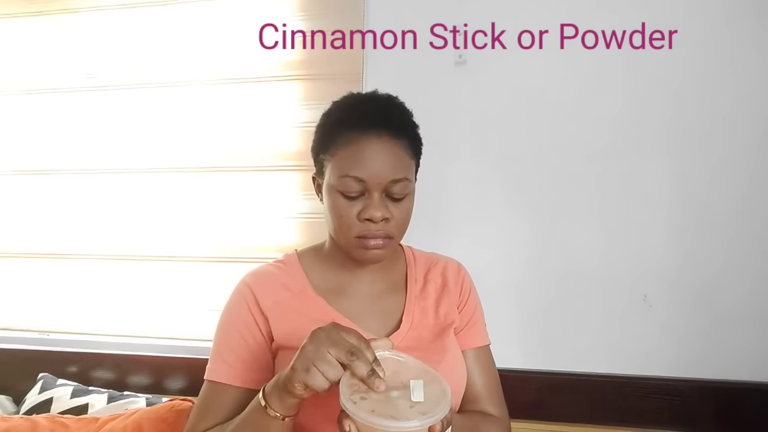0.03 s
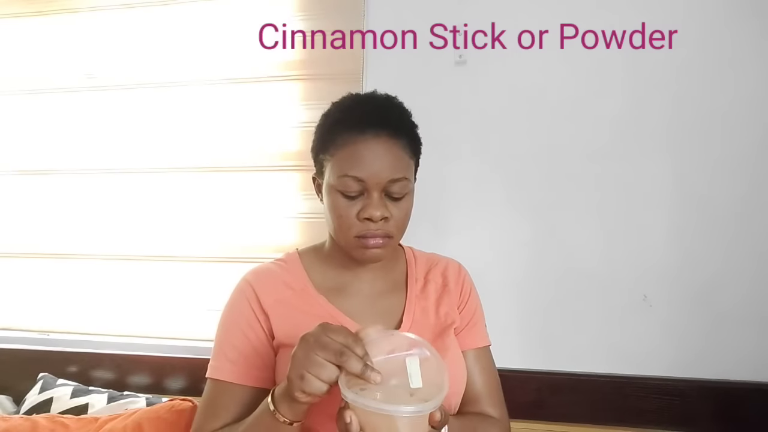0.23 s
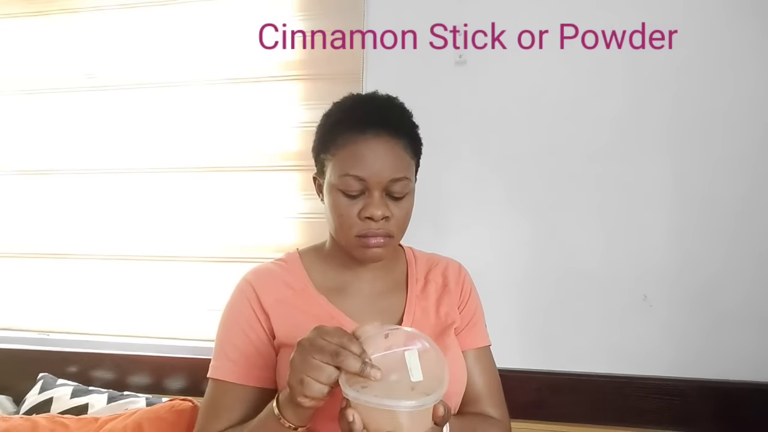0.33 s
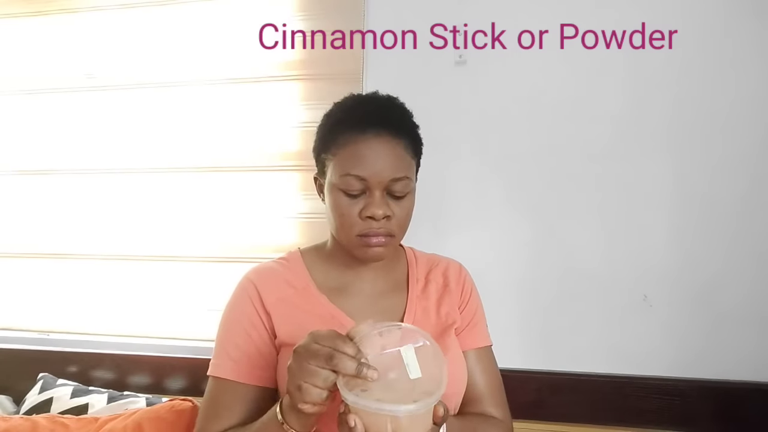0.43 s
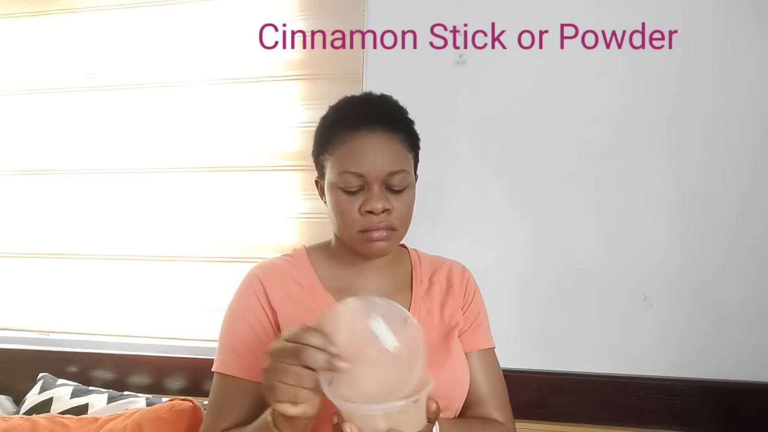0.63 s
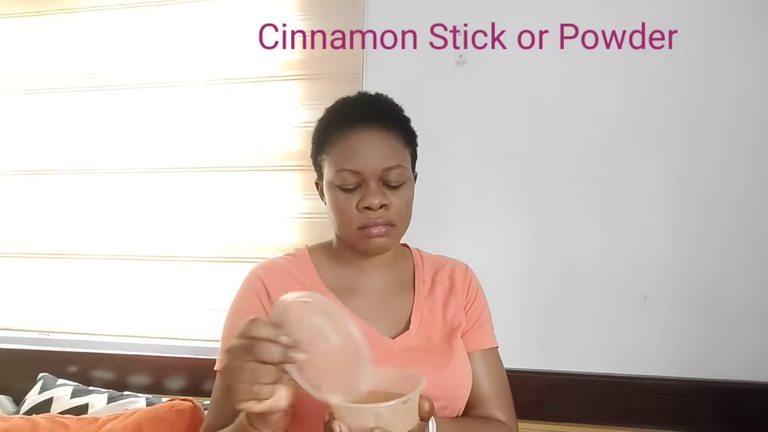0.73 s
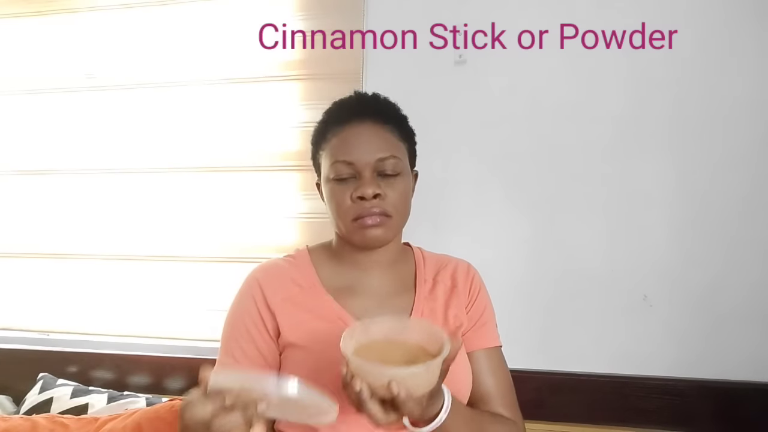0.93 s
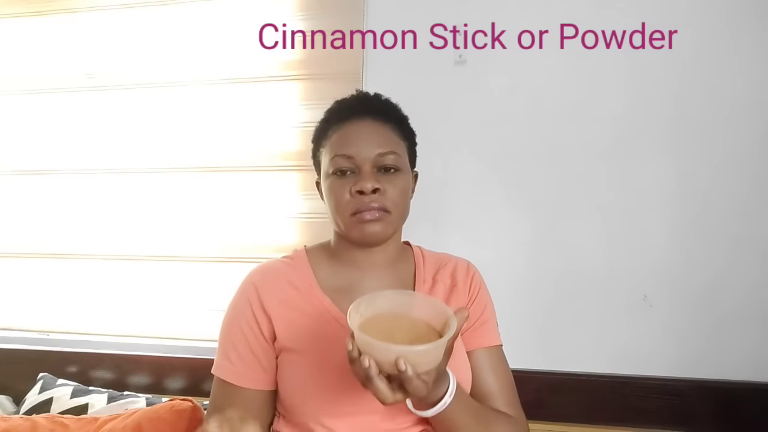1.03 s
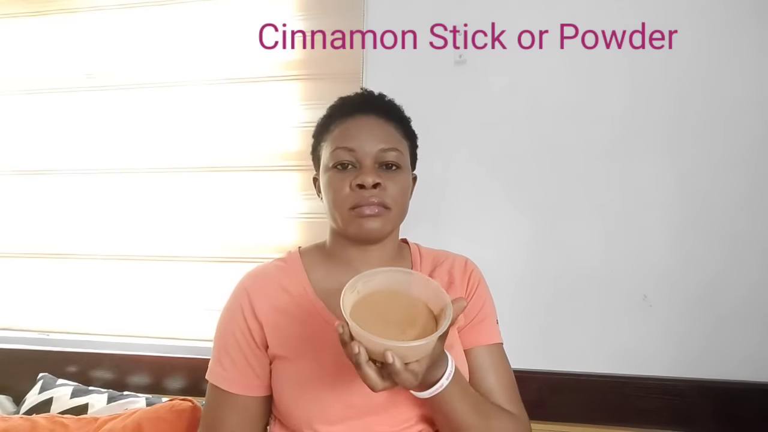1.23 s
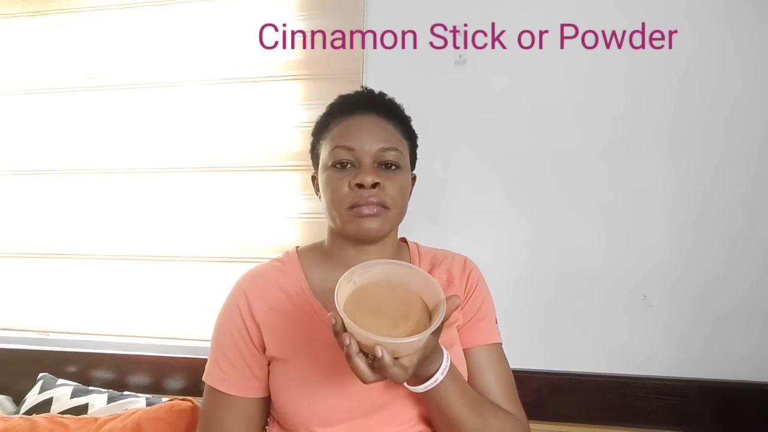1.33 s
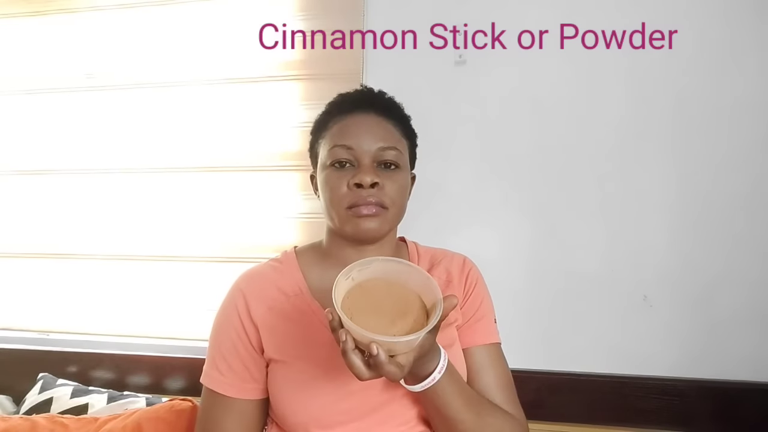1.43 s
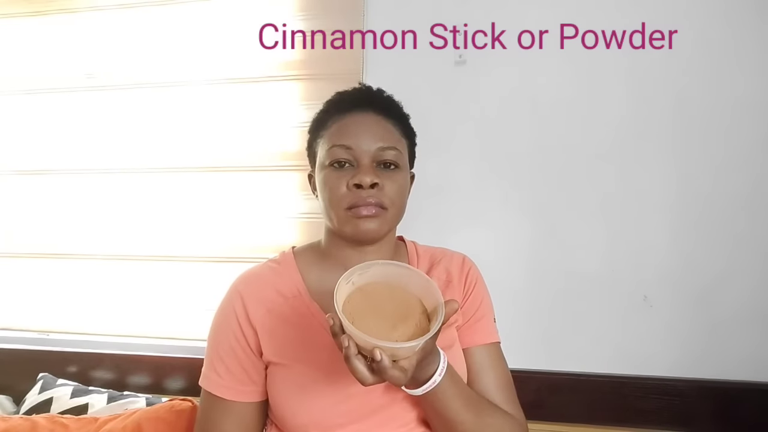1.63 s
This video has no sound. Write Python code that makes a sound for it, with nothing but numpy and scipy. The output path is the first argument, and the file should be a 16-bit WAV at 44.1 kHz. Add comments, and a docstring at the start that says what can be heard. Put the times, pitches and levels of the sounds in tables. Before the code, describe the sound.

A thin plastic lid is pried off a tub close to the microphone: a small tick, a hollow pop with a puff of air, a short scrape, then quickening snaps and a loud rip in a small room.

```python
"""Prying a lid off a tub

A snap-on plastic lid comes off, close to the microphone in a small room: a tick, then a pop with a puff of air.
The lid scrapes along the rim, then lets go in a quickening run of snaps and one loud rip.
Snaps and rubbing drive ringing modes and coloured bursts; the pop is a coloured burst, the puff a pressure pulse.
Shaped noise gives the handling, the room's tail and its low background, with a faint steady-pitched hum."""
import sys
import numpy as np
from scipy import signal
from scipy.fft import rfft, irfft
from scipy.io import wavfile

SR = 44100
rng = np.random.default_rng(int(sys.argv[2]) if len(sys.argv) > 2 else 0)


def pcm_store(signal):
    """Save signal as 16-bit PCM."""
    levels = np.round(np.clip(np.atleast_2d(signal), -1, 1) * 32767)
    wavfile.write(sys.argv[1], SR, levels.astype(np.int16).T)


N = 74970  # samples, 1.7 s

# All table levels are relative unless noted: later gains set how loud each layer is.
# the lid slips on the rim: start_s, knock_db, clack_db, clack_upper_edge_hz, crack_db, crack_decay_s
LID_SNAPS = [(0.1235, -33, -18, 2973, -36, 0.00045), (0.2697, -14.5, -11, 2010, -21.5, .001),
             (0.3006, -15.5, -18.5, 4000, -20.5, .001), (.4290, -22, -33.5, 1500, -31, .001),
             (0.4835, -14, -11.5, 2334, -21, .0005), (0.4945, -11, -20, 2190, -27.5, .001),
             (0.5277, -17, -12, 8910, -1.5, 0.00045), (0.5967, -16.5, -26.5, 3020, -22.5, .001),
             (0.6039, -11, -8.5, 5000, -9, .0008), (0.6214, -12.5, -15, 3040, -11.5, .001),
             (.6240, -16, -15.5, 3990, -5, 0.0018), (0.6406, -20, -16, 4016, 1, .0004),
             (.6443, -17.5, -20, 4080, -4.5, .0006), (.6500, -9.5, -10.5, 3000, -3, 0.00093),
             (0.6679, -10.5, -6, 3000, -10, .001), (0.6717, -7.5, -16.5, 5017, -16.5, .001),
             (0.6773, -13.5, -4, 4990, -11, .001), (.6793, -3, -3, 8000, 2, .0012),
             (0.6828, -24, -14.5, 6137, 1, .001), (0.6945, -36.5, -9.5, 2996, -15, .001),
             (0.6998, -21.5, -14.5, 3990, -16.5, .001)]
# what the lid and tub ring with: pitch_hz, level_db, time_to_fall_60_db_s
LID_MODES = [(320, -19, .025), (375, -14, 0.042), (452.6, -16.5, .03), (632, -11.5, 0.027),
             (918, -17.5, 0.016), (1041, -13, .026), (1193, -17, 0.0082), (1379, -14.5, 0.016),
             (1685, -11.5, 0.0075)]
# colour of the thin wall's mid clack: pitch_hz, level_db
CLACK_COLOUR = [(250, -26), (500, -17), (900, 1.5), (1500, 4), (2500, 2.5), (3600, 0.5), (4800, -9.5),
                (7000, -17), (15000, -29.5)]
# colour of the thin wall's bright crack: pitch_hz, level_db
CRACK_COLOUR = [(200, -44.5), (700, -15.5), (1500, -20.5), (2800, -7.5), (4400, -8.5), (5500, -12.5),
                (7000, -4), (8600, 1), (10500, -6.5), (13000, -8), (15500, -6)]
# friction as the lid scrapes along the rim: time_s, level_db
SCRAPE_LEVEL = [(.290, -27), (.303, -2.5), (.314, 1.5), (.34, -2.5), (.37, -6.5), (.41, -19.5),
                (.47, -18.5), (.51, -53.5)]
# friction in the final rip: time_s, level_db
RIP_LEVEL = [(.655, -22), (.671, 6.5), (.680, 6), (.688, -1), (.70, -7.5), (.72, -28)]
# echoes off close surfaces: left_delay_s, right_delay_s, level_db
CLOSE_ECHOES = [(.00172, 0.0017, -8), (.0040, .0038, -11)]
# the room's tail: pitch_hz, level_db, time_to_fall_60_db_s
ROOM_TAIL = [(100.2, -20.5, 0.44), (230, -4, .5), (375, -3, .5), (1010, -2, 0.47), (1863, -2.5, 0.5),
             (3516, 0, 0.54), (5420, -3.5, 0.52), (8200, -3.5, 0.46), (12030, -2.5, 0.43), (15540, -6, 0.4)]
# how alike left and right are in diffuse sound: pitch_hz, likeness (0 unrelated, 1 the same)
SIDE_LIKENESS = [(200, 0.87), (400, 0.3), (800, 0), (1600, 0), (4000, 0), (12000, 0)]
# colour of the background noise: pitch_hz, level_db
BACKGROUND_COLOUR = [(30, -57), (60, -20.5), (90, -5), (140, -2), (220, -6), (300, -12.5), (450, -12.5),
                     (800, -18), (1600, -21.5), (4000, -29.5), (8500, -32.5), (15500, -33)]
# hands rub the plastic, taking hold and later moving the lid away: time_s, level_db (re full scale)
GRIP_LEVEL = [(0, -52.5), (.1, -55), (.2, -56), (.3, -87), (.85, -76), (1.0, -55.5), (1.15, -68),
              (1.3, -81.5)]
# colour of that rubbing: pitch_hz, level_db
RUBBING_COLOUR = [(300, -3.5), (1200, 6), (3000, -6), (5500, -11), (8700, -2), (11000, -11.5), (15000, -10)]
# the lid flips and pushes out air: start_s, level_db, upper_edge_hz
AIR_PUFFS = [(0.2131, -2.5, 819), (0.681, -26, 298.6)]
# uneven beaming of the crack, before each side is scaled to unit energy: pitch_hz, left_minus_right_db
CRACK_BEAM = [(2000, 1.5), (4500, 6.5), (6500, 1), (8500, -11), (10500, -6.5), (12500, 5.5), (15500, 7)]
# colour of the hollow, bright burst as the seal tears open: pitch_hz, level_db
POP_COLOUR = [(150, -34), (500, -6.5), (820, 8.5), (1000, -3), (1200, -0.5), (1450, -0.5), (1720, 1),
              (2300, -13), (4000, -13), (5400, -17), (7000, -5), (8800, -2), (11000, -11), (15500, -0.5)]

T = np.arange(N) / SR  # s
EDGES = np.geomspace(25, 17500, 29)  # band edges, Hz
CENTRES = np.sqrt(EDGES[1:] * EDGES[:-1])  # Hz

BACKGROUND_DB, HUM_HZ, HUM_DB, HUM_WAVER = -55.5, 218.2, -58.5, .15  # waver: rms share of the hum
MODE_SCATTER_DB, BEND_SHARE = 2.5, .04  # largest change of a mode's level and pitch, up or down
CLACK_DB, CRACK_DB = 8, 9
BODY_LOW_CUT_HZ = 250  # the small lid radiates little bass
SLIPS_PER_S, SLIP_SPREAD_DB = 1500, 2.5  # average rate, spread before the extremes are limited
RUB_KNOCK_DB, RUB_CLACK_DB, RUB_CRACK_DB = -39, -42.5, -37
SUCTION_S, SUCTION_SHARE = .0024, .51  # build-up time, strength beside the push of air
PUFF_DECAY_S, PUFF_LOW_HZ, PUFF_PAN_DB = .0017, 94.5, -3
SWING_HZ, SWING_T60_S, SWING_DB = 117, .019, -6  # the air swings in the tub's mouth
POP_S, POP_DB, POP_DECAY_S, POP_PAN_DB = .2130, 16.5, .0026, 1
LEFT_LAG_S = .00003  # direct sound reaches the left later
ROOM_DB, ROOM_BUILD_S = -3.5, .004
SCATTER_DB, SCATTER_DECAY_S = -7, .0042  # early scatter off hands, body and sofa
# how much of each source reaches the microphone directly, and how much excites the room
BODY_NEAR_DB, CRACK_NEAR_DB, POP_NEAR_DB = -.5, -4.5, -8
BODY_ROOM_DB, CRACK_ROOM_DB, POP_ROOM_DB = 0, -.36, 1.9
CUTOFF_HZ = 15750


def amp(db):
    """Turn decibels into a gain."""
    return 10 ** (np.asarray(db) / 20)


def unit(x):
    """Scale to unit energy."""
    return x / np.sqrt(np.sum(x ** 2) + 1e-20)


def at_hz(table, hz, axis=1):
    """Read a table column between its rows, with pitch spaced logarithmically."""
    table = np.array(table)
    return np.interp(np.log(hz), np.log(table[:, 0]), table[:, axis])


def level(curve):
    """Gain over time, practically silent outside the curve."""
    return amp(np.interp(T, *np.transpose(curve), left=-150, right=-150))


def passed(x, order, hz, kind="low"):
    """Keep only one range of pitches; the tiny offset avoids slow arithmetic in silence."""
    return signal.sosfilt(signal.butter(order, hz, kind, fs=SR, output="sos"), x + 1e-18)


def colour(x, table):
    """Filter with the table's spectrum, scaled to unit energy, without sounding ahead of the input."""
    size = 4096
    hz = np.maximum(np.arange(size // 2 + 1) * SR / size, 1)
    # folding the cepstrum gives a minimum-phase filter
    cepstrum = irfft(np.log(amp(at_hz(table, hz))))
    cepstrum[1:size // 2] *= 2
    cepstrum[size // 2 + 1:] = 0
    response = unit(irfft(np.exp(rfft(cepstrum))))
    return signal.fftconvolve(x, response)[:N]


def ring(x, hz, t60):
    """One mode: every push starts a sine that falls 60 dB in t60 seconds."""
    r = np.exp(-np.log(1000) / (t60 * SR))
    w = 2 * np.pi * hz / SR
    return signal.lfilter([0, np.sin(w)], [1, -2 * r * np.cos(w), r * r], x + 1e-18)


def delay(x, s):
    """The same sound, later."""
    return np.concatenate([np.zeros(int(round(abs(s) * SR))), x])[:N]


def panned(x, db):
    """Place a sound: left minus right in dB."""
    return x * amp(db * np.array([[.5], [-.5]]))


def burst(start_s, decay_s):
    """A tiny run of fractures, even across the spectrum, that dies at once; unit energy."""
    t = T[:SR // 10]
    spectrum = rfft(rng.standard_normal(len(t)) * np.exp(-t / decay_s))
    # keep the timing of the noise but make all pitches equally strong
    run = irfft(np.exp(1j * np.angle(spectrum)))[:len(t) // 2]
    return delay(np.pad(unit(run), (0, N)), start_s)


def diffuse_bands():
    """Stereo noise in about third octaves, alike in the bass and unrelated in the treble."""
    mid, side = rfft(rng.standard_normal((2, N)))
    hz = np.arange(len(mid)) * SR / N
    for low, high, centre in zip(EDGES, EDGES[1:], CENTRES):
        alike = np.clip(at_hz(SIDE_LIKENESS, centre), -1, 1)
        shared = np.sqrt(1 + alike) * mid
        opposed = np.sqrt(1 - alike) * side * np.array([[1], [-1]])
        in_band = (hz >= low) & (hz < high)
        yield centre, irfft((shared + opposed) * in_band, N)


def air(table):
    """Diffuse noise of a given colour, rms 1."""
    noise = sum(amp(at_hz(table, hz)) * band for hz, band in diffuse_bands())
    return unit(noise) * np.sqrt(2 * N)


def background():
    """Low room noise and a hum whose loudness wavers slowly and randomly."""
    waver = unit(passed(rng.standard_normal(N), 2, 6)) * np.sqrt(N)
    hum = np.sqrt(2) * np.sin(2 * np.pi * HUM_HZ * T) * (1 + HUM_WAVER * waver)
    return amp(BACKGROUND_DB) * air(BACKGROUND_COLOUR) + amp(HUM_DB) * hum


def grip():
    """Hands rubbing faintly on the plastic: diffuse noise that swells and fades."""
    return level(GRIP_LEVEL) * air(RUBBING_COLOUR)


def knocks():
    """Each snap rings the low modes, detuned by how the lid is bent just then."""
    out, t = np.zeros(N), T[:SR // 8]
    hz, mode_db, t60 = np.transpose(LID_MODES)[:, :, None]
    signs = (-1) ** (np.arange(len(LID_MODES)) // 2)
    for s, db, *_ in LID_SNAPS:
        bend, strength = rng.uniform(-1, 1, (2, len(LID_MODES), 1))
        gain = amp(db + mode_db + MODE_SCATTER_DB * strength)
        fade = np.exp(-np.log(1000) * t / t60)
        tone = np.sin(2 * np.pi * hz * (1 + BEND_SHARE * bend) * t)
        start = int(s * SR)
        out[start:start + len(t)] += signs @ (gain * fade * tone)
    return out


def blows():
    """At each snap one clean push; a lower upper edge makes a softer, duller contact."""
    out = 0
    for s, _, db, edge_hz, _, _ in LID_SNAPS:
        push = signal.unit_impulse(N, int(s * SR))
        out = out - amp(db) * passed(push, 2, min(edge_hz, SR / 3))
    return out


def lid_body():
    """Snaps and slips ring the lid's low modes and clack in its wall."""
    rub = amp(RUB_KNOCK_DB) * friction()
    rubbed = 0
    for k, (hz, db, t60) in enumerate(LID_MODES):
        rubbed = rubbed + amp(db) * ring(rub, hz, t60) * (-1) ** (k // 2)
    clack = colour(blows() + amp(RUB_CLACK_DB) * friction(), CLACK_COLOUR)
    body = knocks() + rubbed + amp(CLACK_DB) * clack
    return passed(body, 3, BODY_LOW_CUT_HZ, "high")


def lid_crack():
    """The bright edge of each snap and the hiss of the scrape, coloured by the thin wall."""
    snaps = sum(amp(db) * burst(s, decay_s) for s, *_, db, decay_s in LID_SNAPS)
    return amp(CRACK_DB) * colour(snaps + amp(RUB_CRACK_DB) * friction(), CRACK_COLOUR)


def puff():
    """Suction builds under the lid and flips into a short push of air, which swings in the tub's mouth."""
    out = 0
    for s, db, high_hz in AIR_PUFFS:
        t = T - s
        suction = -SUCTION_SHARE * np.exp(-abs(t) / SUCTION_S)
        push = np.exp(-abs(t) / PUFF_DECAY_S)
        swing = ring(signal.unit_impulse(N, int(s * SR)), SWING_HZ, SWING_T60_S)
        pressure = np.where(t < 0, suction, push) + amp(SWING_DB) * swing
        out = out + amp(db) * passed(pressure, 2, [PUFF_LOW_HZ, high_hz], "band")
    return panned(out, PUFF_PAN_DB)


def seal_pop():
    """The seal tears open: a brief run of fractures with a hollow, bright colour."""
    return amp(POP_DB) * colour(burst(POP_S, POP_DECAY_S), POP_COLOUR)


def friction():
    """Dense uneven slips, fresh on each call, while the lid drags over the rim."""
    happens = rng.random(N) < SLIPS_PER_S / SR
    direction = rng.choice([-1, 1], N)
    strength = amp(SLIP_SPREAD_DB * np.clip(rng.standard_normal(N), -2, 2))
    slips = unit(happens * direction * strength) * np.sqrt(N)  # rms 1
    return slips * (level(SCRAPE_LEVEL) + level(RIP_LEVEL))


def near(x):
    """Direct sound and the first echoes off tub, hands and body."""
    sides = []
    for c in (0, 1):  # left, right
        direct = delay(x, LEFT_LAG_S * (1 - c))
        echoes = sum(amp(row[2]) * delay(x, row[c]) for row in CLOSE_ECHOES)
        sides.append(direct + echoes)
    return np.array(sides)


def beamed(pair):
    """Colour the two sides oppositely, because the crack beams unevenly."""
    sides = zip(pair, (.5, -.5))
    return np.array([colour(x, [(hz, side * db) for hz, db in CRACK_BEAM]) for x, side in sides])


def room(x):
    """Early scatter, then a diffuse tail that builds quickly and dies band by band."""
    response = 0
    scatter = amp(SCATTER_DB) * unit(np.exp(-T / SCATTER_DECAY_S))
    for hz, band in diffuse_bands():
        fade = np.exp(-np.log(1000) * T / at_hz(ROOM_TAIL, hz, axis=2))
        fade = fade * (1 - np.exp(-T / ROOM_BUILD_S))
        tail = amp(ROOM_DB + at_hz(ROOM_TAIL, hz)) * unit(fade)
        response = response + band * np.hypot(tail, scatter)
    return signal.fftconvolve(x[None], response, axes=1)[:, :N]


def scene():
    """Add up lid, seal, puffs and hands with the room and its background."""
    body, crack, pop = lid_body(), lid_crack(), seal_pop()
    close = amp(BODY_NEAR_DB) * near(body)
    close = close + amp(CRACK_NEAR_DB) * beamed(near(crack))
    close = close + amp(POP_NEAR_DB) * panned(near(pop), POP_PAN_DB)
    tail = room(amp(BODY_ROOM_DB) * body + amp(CRACK_ROOM_DB) * crack + amp(POP_ROOM_DB) * pop)
    return close + puff() + tail + grip() + background()


def record(dry):
    """Peaks beyond full scale are clipped, then the top of the treble is cut."""
    top_cut = signal.ellip(10, .1, 70, CUTOFF_HZ, fs=SR, output="sos")
    return signal.sosfilt(top_cut, np.clip(dry, -1, 1))


dry = scene()
out = record(dry)
pcm_store(out)
```